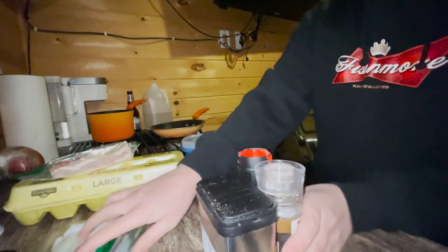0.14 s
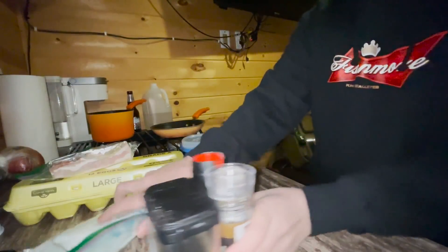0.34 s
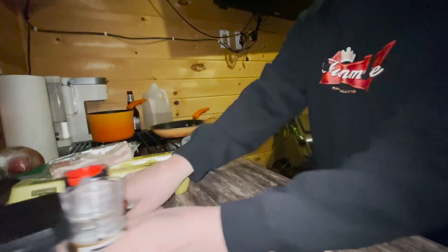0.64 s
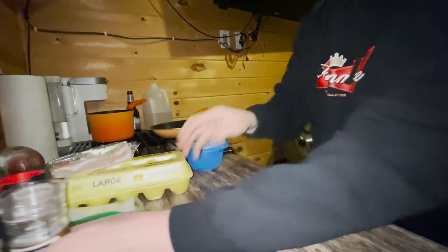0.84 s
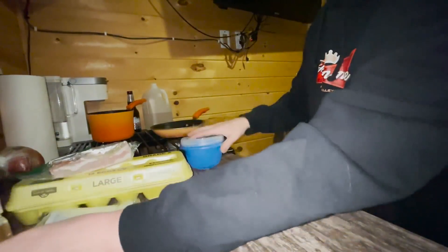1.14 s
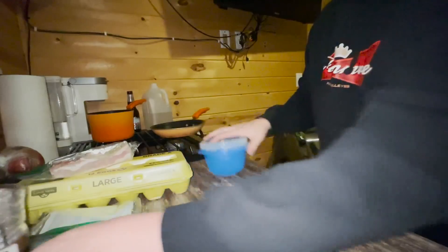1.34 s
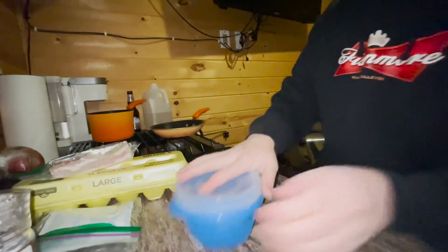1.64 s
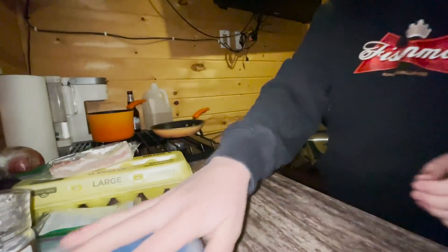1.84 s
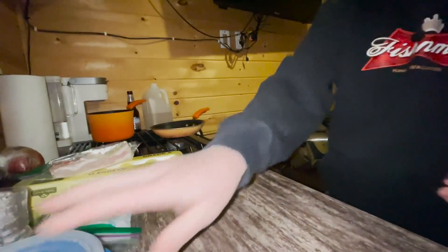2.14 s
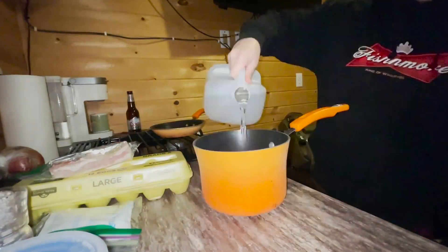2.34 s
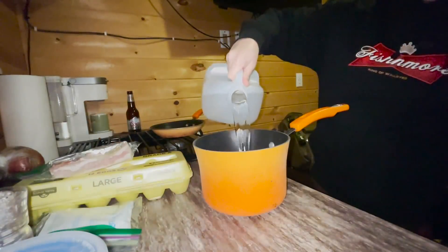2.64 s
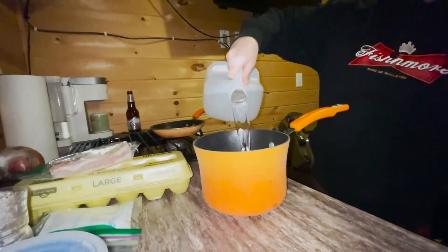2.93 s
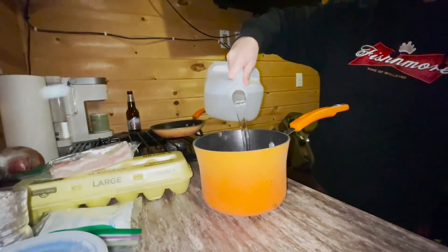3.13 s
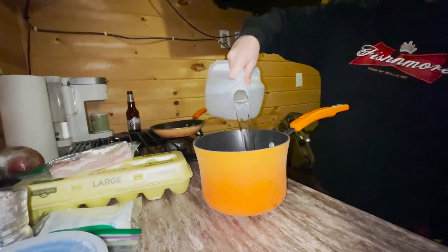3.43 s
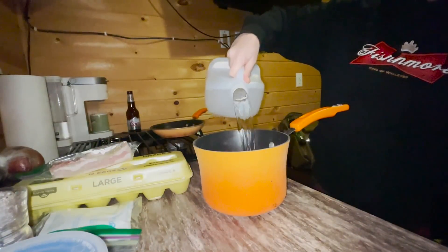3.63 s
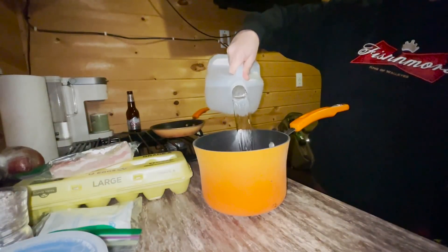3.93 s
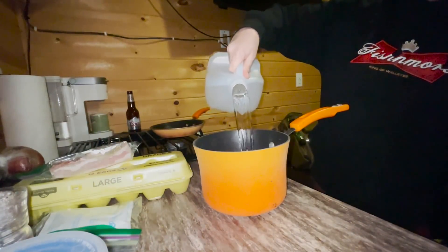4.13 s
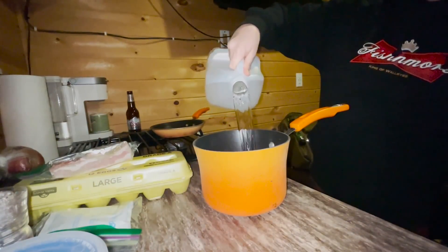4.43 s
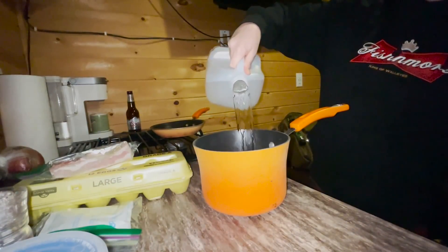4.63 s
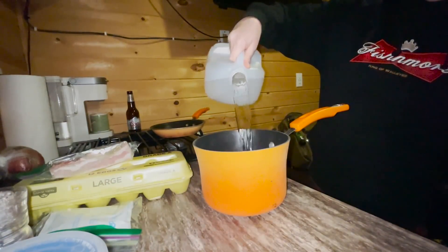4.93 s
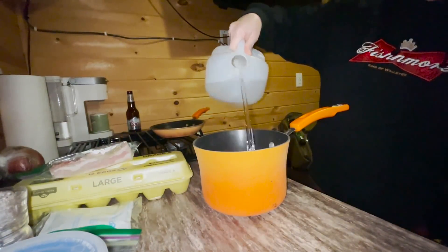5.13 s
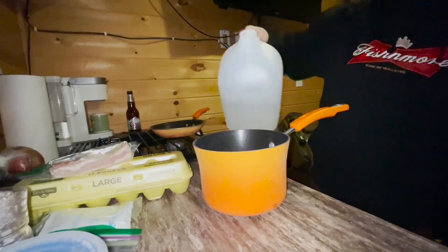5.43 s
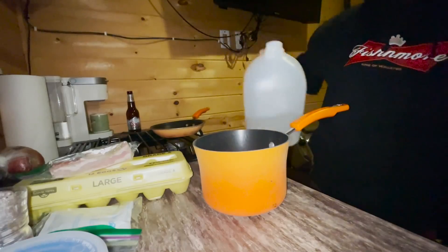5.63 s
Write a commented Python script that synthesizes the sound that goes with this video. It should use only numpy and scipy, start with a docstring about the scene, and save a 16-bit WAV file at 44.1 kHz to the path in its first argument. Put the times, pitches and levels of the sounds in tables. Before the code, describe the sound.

Jars judder and scratch across a counter while a sleeve rustles and thin plastic snaps. A plastic tub knocks down, slides with a hollow rub and lands among other things with a small metallic rattle. Then water pours from a jug into a saucepan, splashing, bubbling and plopping. A generator hums low through the wall of the small wooden cabin. The microphone sits close by on the counter.

```python
"""Jars judder and scratch across a counter in a small wooden cabin, their bases sticking and slipping.
A plastic tub slides after them; things knock down, thin plastic snaps, metal jingles, a sleeve rustles.
Then water pours from a jug into a saucepan: fine spray, ringing bubbles, deeper plops, a singing wall.
A generator hums through the cabin wall. All is heard at two microphone ports on the counter."""
import sys
import numpy as np
from scipy import signal
from scipy.fft import rfft, irfft
from scipy.io import wavfile
from scipy.ndimage import uniform_filter1d

SR = 44100
rng = np.random.default_rng(int(sys.argv[2]) if len(sys.argv) > 2 else 0)


def wrap_up_sound(samples):
    """Save the sound to the file named by the first command line argument, as 16-bit audio."""
    columns = np.atleast_2d(samples).T
    # keep every value between -1 and 1, then stretch to whole-number steps
    tamed = np.clip(columns, -1, 1)
    steps = np.round(tamed * 32767).astype(np.int16)
    wavfile.write(sys.argv[1], SR, steps)


N = 254456
TIME_S, FREQ_HZ = np.arange(N) / SR, np.fft.rfftfreq(N, 1 / SR)
POUR_START_S, POUR_LENGTH_S = 2.875, 2.485

# jar pushes: t/s, length/s, judder/dB, scratch/dB
PUSHES = [(-.1, 0.089, -21.5, -34), (0.113, 0.063, -29.5, -36), (0.211, 0.85, -18, -26)]
# blows on the counter: t/s, level/dB, cutoff/Hz, contact decay/s
COUNTER_HITS = [(0.149, -19.5, 340, 0.012), (0.248, -17, 1000, 0.0092), (0.378, -11.5, 454, 0.0092),
                (1.127, -20, 800, 0.03), (1.382, -12.5, 440, 0.044), (1.448, -15, 334, 0.093),
                (1.52, -14, 433, 0.014), (1.587, -15, 306, 0.032), (1.93, -20.5, 160, 0.026),
                (2.006, -28, 300, 0.03), (2.074, -15.5, 1190, 0.028), (2.116, -16.5, 160, 0.0025),
                (2.162, -16.5, 700, 0.024), (2.243, -29.5, 260, 0.053)]
# tub base landing: t/s, level/dB, cutoff/Hz
TUB_LANDINGS = [(1.3768, -9, 2200), (1.405, -22, 1500), (1.4768, -15.5, 1200), (1.489, -7.5, 1700)]
# plastic snaps: t/s, level/dB, tilt/(dB/oct), mode f/Hz, ring/dB
PLASTIC_SNAPS = [(0.1417, -15.5, 1, 2800, 9.5), (0.644, -21.5, -1, 3100, 7), (0.697, -21.5, 1, 3030, 2),
                 (0.885, -31, 6, 4400, -4), (0.8921, -13.5, 6.5, 5400, -6), (0.9945, -17.5, 6, 4030, -24),
                 (1.0621, -18, 1.5, 3460, -9), (1.087, -20, 6.5, 3700, -8), (1.1672, -27, -2, 2900, -2),
                 (1.921, -25.5, 5, 4360, -3), (1.9832, -25.5, 2.5, 3600, -2), (2.357, -43, 11, 4030, -2),
                 (2.659, -41, 28, 11100, 15), (2.755, -42, 15, 6100, -15)]
# tub set down among other things: t/s, level/dB, tilt/(dB/oct), relative jingle/dB
RATTLE_HITS = [(2.0177, -11.5, -2, -4.5), (2.025, -16, -4.5, -30), (2.05, -16.5, -6, -18),
               (2.056, -18.5, 1, 0), (2.073, -16, -1.5, -32), (2.083, -19.5, 0, -38), (2.105, -27.5, 0, -8),
               (2.147, -27.5, 0.5, -26), (2.158, -26.5, -0.5, -41), (2.185, -21.5, -8, -5),
               (2.194, -20, -6, -20), (2.211, -24, -3, -5), (2.23, -25, -10.5, -25)]
# sleeve and packaging moves: t/s, length/s, level/dB, attack/s, fade/(dB/s)
RUSTLES = [(0.077, 0.022, -43, 0.0075, 2), (0.092, 1.13, -40.5, 0.12, 9), (1.058, 0.044, -36.5, .003, 60),
           (1.218, 1.31, -49.5, 0.095, 13.5), (5.496, 0.098, -65, 0.024, 15), (5.63, .2, -56, 0.092, 9)]
# stream landing in the pan: t/s, flow/dB, spray/dB
STREAM = [(2.9, -57.5, -62), (3.08, -59, -62.5), (3.49, -56.5, -61.5), (3.82, -50, -58.5),
          (3.94, -53, -60.5), (4.13, -56, -66.5), (4.348, -57.5, -67.5), (4.75, -60, -71.5),
          (4.95, -58.5, -65.5), (5.17, -52.5, -60.5), (5.23, -50, -56), (5.36, -59, -66)]
# drops hitting pan or water: t/s, level/dB, tilt/(dB/oct)
DROPS = [(2.885, -42.5, 2), (3.009, -36.5, -1), (3.069, -34, 0), (3.101, -37, 0), (3.242, -32.5, -3),
         (4.039, -36, -2.5), (3.299, -29.5, 4.5), (4.323, -38.5, -2.5), (4.618, -39.5, -3.5),
         (4.718, -36.5, -4), (4.841, -36, -8.5), (4.89, -38, -8), (5.19, -46, -3), (5.237, -37, -5.5),
         (5.286, -35, -4), (5.374, -36, -6)]
# single bubbles: t/s, relative level/dB, f/Hz, t60/s
PLOPS = [(2.733, -48, 2310, 0.079), (2.901, -48, 5140, 0.02), (2.954, -43, 2850, 0.019),
         (3.003, -32, 2970, 0.02), (3.011, -36, 6050, 0.011), (3.022, -37, 5830, 0.018),
         (3.075, -36.5, 1760, 0.041), (3.1, -34.5, 7950, 0.0071), (3.202, -37.5, 2830, 0.02),
         (3.244, -36.5, 3150, 0.018), (3.245, -36.5, 705, 0.063), (3.266, -34.5, 626, 0.059),
         (3.431, -40, 2760, 0.03), (3.607, -44, 680, 0.07), (3.611, -46.5, 1030, 0.063),
         (3.62, -40, 615, 0.14), (3.684, -34.5, 666, 0.073), (3.727, -40, 2340, 0.04),
         (3.783, -33.5, 2220, 0.022), (3.807, -41, 2930, 0.036), (3.843, -49, 690, 0.24),
         (3.967, -37.5, 2430, 0.042), (3.992, -39, 2270, 0.052), (4.04, -36.5, 2390, 0.02),
         (4.06, -36, 2200, 0.047), (4.091, -38, 2330, 0.027), (4.114, -36, 2870, 0.012),
         (4.305, -41, 2500, 0.014), (4.322, -46, 1065, 0.087), (4.323, -41, 2730, 0.023),
         (4.352, -44.5, 610, .16), (4.387, -34, 762, 0.16), (4.423, -32, 674, 0.061),
         (4.424, -41.5, 2470, 0.025), (4.485, -31.5, 520, 0.11), (4.585, -50, 702, 0.19),
         (4.697, -43, 2360, 0.017), (4.718, -42, 2400, 0.018), (4.726, -40.5, 628, 0.099),
         (4.773, -39.5, 670, 0.12), (4.84, -40.5, 3000, 0.02), (4.843, -43, 674, 0.15),
         (4.89, -38.5, 2310, 0.022), (4.891, -34.5, 540, 0.062), (4.893, -40, 864, 0.11),
         (4.949, -44, 2480, 0.02), (5.113, -41, 6800, 0.02), (5.144, -43, 1290, 0.046),
         (5.191, -24, 577, 0.025), (5.21, -37.5, 2450, 0.044), (5.217, -40, 6300, 0.01),
         (5.271, -40, 2640, 0.026), (5.286, -32.5, 535, 0.054), (5.325, -43, 2700, 0.022),
         (5.35, -45, 2390, .03), (5.365, -24, 515, 0.047)]
# pan wall tones: f/Hz, relative level/dB
WALL_TONES = [(1135, -7), (1635, 0), (1900, -7)]
# generator harmonics: multiple of firing rate, relative level/dB
ORDERS = [(1, -61.5), (2, -43), (3, -62), (4, -44), (5, -49), (6, -55), (8, -66.5), (10, -57.5), (12, -86),
          (14, -85)]

# modes of struck bodies: f/Hz, level/dB, t60/s
COUNTER_MODES = [(160, 3, 0.21), (212, 0.5, 0.14), (300, 25, 0.091), (450, 10, 0.015), (710, -4, 0.06),
                 (1210, -6, 0.43)]
TUB_MODES = [(185, -9, .06), (340, -7, .05), (560, -6, .035), (790, -3, .03), (1050, 0, .033),
             (1400, -3, .022), (2100, -11, .018)]
METAL_MODES = [(3343, -19, .45), (4828, -17, .22), (8301, -16, .12), (8630, -5, .19), (8668, -8, .12),
               (8740, -4, .05), (11000, -12, .03)]
PAN_MODES = [(680, 0, .06), (1100, 16, 0.13), (1670, 8, 0.34), (2050, 4, 0.088), (2580, -8, 0.097),
             (7200, -2, 0.11)]
# modes of the rubbed tub: f/Hz, level/dB, t60/s
HOLLOW_MODES = [(640, 34, .029), (1250, -38.5, .056), (4560, -28, .015)]

# source spectra: f/Hz, relative level/dB
JAR_EQ = [(40, -43), (70, -23), (160, -7.5), (230, -16.5), (305, -4.5), (360, -14.5), (450, -10.5),
          (660, -9.5), (930, -13), (1250, -15.5), (1900, -28), (5600, -47.5), (6900, -51), (7600, -65),
          (12700, -86), (16000, -92)]
SLIDE_EQ = [(180, -11), (300, 11.5), (337, -44), (447, -12), (624, 2), (978, -5.5), (2170, -12),
            (3030, -22.5), (4520, -18.5), (5520, -30.5), (6300, -25.5), (7440, -30.5), (12900, -30.5),
            (15200, -41), (16000, -68)]
KNOCK_EQ = [(40, -24.5), (110, -2), (180, -1), (300, -1.5), (450, 2.5), (950, 1), (1800, -8), (4000, -7),
            (16000, -34)]
SNAP_EQ = [(100, -43), (600, -11), (1100, 3), (2100, 14.5), (3300, 9), (4500, 10), (6200, 5), (7400, -3.5),
           (8700, 0), (10000, -15), (13000, -6.5), (16000, -14.5)]
RATTLE_EQ = [(100, -28.5), (600, -17.5), (1300, -12), (2200, -7), (3200, -4), (4800, -3.5), (5700, -11),
             (6700, -8.5), (7600, -25), (8700, -6.5), (9600, -27), (11000, -19.5), (14000, -22),
             (16000, -34)]
RUSTLE_EQ = [(300, 0), (1500, 5.5), (4000, 2), (6500, -0.5), (7600, -5), (8600, -3), (13000, -7.5),
             (16000, -21)]
POUR_EQ = [(260, -35), (450, -20.5), (680, 3), (950, -9), (1500, -8), (2350, -5.5), (3100, -8), (3900, -13),
           (4700, -14.5), (5500, -17.5), (6800, -7.5), (7500, -23), (8300, -5), (10000, -14.5),
           (12200, -6.5), (16000, -28)]
RUMBLE_EQ = [(15, -58), (25, -69), (42, -24), (64, -4), (249, -11), (335, -22), (373, -17), (476, -18.5),
             (659, -31), (1160, -28.5), (7510, -56.5), (11000, -59.5), (16000, -64)]

# paths from each spot to the ports: f/Hz, left-right level/dB, left-right phase/rad, likeness/(0-1)
JAR_SPOT = [(90, 5.0, 0.4, 0.94), (260, -0.3, -0.3, 0.73), (420, -1.6, 1.0, 0.61), (660, 2.8, 2.3, 0.78),
            (1090, 6.5, 2.6, 0.33), (1870, 2.2, 3.3, 0.45), (3350, 4.7, 3.0, 0.11), (6000, 10.6, 0.7, 0.1),
            (9380, 4.4, 2.8, 0.44), (11730, 0.2, 1.1, 0.62), (14140, 0.0, 0.1, 0.96)]
COUNTER_SPOT = [(90, 4.4, 0.3, 0.93), (280, 0.1, 0.4, 0.43), (440, 0.5, 1.3, 0.54), (660, 5.1, 2.1, 0.64),
                (1170, 6.3, 2.7, 0.5), (2040, 3.1, 3.3, 0.27), (3610, 5.9, 2.0, 0.24),
                (6400, 10.0, 3.4, 0.13), (9500, 2.9, 2.1, 0.11), (11730, 0.9, 0.6, 0.88),
                (14140, 0.1, 0.1, 0.97)]
PAN_SPOT = [(100, 1.1, 0.1, 0.95), (320, 1.0, 0.5, 0.5), (540, 0.3, 1.0, 0.72), (780, 5.5, -0.6, 0.27),
            (1380, 2.8, 1.7, 0.18), (2570, 1.3, 1.3, 0.54), (4140, 2.8, 2.0, 0.22), (6650, 4.7, 4.6, 0.12),
            (9670, -0.4, 2.6, 0.44), (11730, 0.7, 1.4, 0.79), (14140, 0.0, 0.2, 0.92)]
# cabin reverberation: f/Hz, t60/s
CABIN_DECAY = [(100, 0.51), (500, 0.083), (3000, 0.26), (8000, 0.33), (15000, 0.035)]


def jar_drag(tiring_db_per_s=3, slow_scratch_db=-12.5):
    """Stick-slip: jar bases drum on the counter and scratch it, the scratch strongest at speed."""
    slips = resonate(grains(per_s=2600, spread_db=1.8), COUNTER_MODES, ring_db=-6)
    drumming = band(colour(slips, JAR_EQ), 95, 560)
    scraping = band(colour(grains(per_s=2600, spread_db=1.8), JAR_EQ), 540, 15000)
    judder, scratch = np.zeros((2, N))
    for s, length_s, judder_db, scratch_db in PUSHES:
        push = stroke(s, length_s, attack_s=.053, release_s=.059)
        t = np.clip(TIME_S - s, 0, length_s)
        speed = np.sin(np.pi * np.interp(t / length_s, [0, .24, 1], [0, .5, 1]))  # peak at 24 %
        judder += push * amp(judder_db - tiring_db_per_s * t)
        scratch += push * amp(scratch_db + slow_scratch_db * (1 - speed ** 2))
    out = amp(-3) * drumming * judder + amp(7) * scraping * scratch
    return roaming(out, JAR_SPOT, room_db=-7, near=.35, step_s=.11, count=6)


def tub_slide(fastest_s=1.754, rise_db_per_s=28, fall_db_per_s=34.5, hiss_power=1.96):
    """The counter's grain rubs the tub and rings its hollow; it hisses only while it lies flat."""
    friction = grains(per_s=8300, spread_db=5)
    rub = colour(resonate(friction, HOLLOW_MODES, ring_db=-26), SLIDE_EQ)
    t = TIME_S - fastest_s
    speed_db = np.minimum(rise_db_per_s * t, -fall_db_per_s * t)
    hollow = band(rub, 365, 3240) * amp(-24.5 + speed_db)
    hiss = band(rub, 4100, 22000) * amp(-30 + hiss_power * speed_db)
    touching = stroke(1.2, 1.12, attack_s=.14, release_s=.072)
    flat = stroke(1.42, .58, attack_s=.0081, release_s=.023)
    return placed(touching * hollow + flat * hiss + rim_scrape(), COUNTER_SPOT, room_db=-27)


def rim_scrape(start_s=1.24, length_s=.13, rise_hz_per_s=1105):
    """The tub's rim catches as it starts to move, chattering in a narrow rising band."""
    hz = 830 + rise_hz_per_s * np.clip(TIME_S - start_s, 0, length_s)
    catch = stroke(start_s, length_s, attack_s=.086, release_s=.011)
    return amp(-35) * singing(hz, width_hz=95) * catch


def counter_knocks():
    """Blows ring the counter; soft ones reach only its low modes."""
    out = np.zeros(N)
    for s, db, cutoff_hz, decay_s in COUNTER_HITS:
        blow = signal.sosfilt(butter(cutoff_hz, "low"), burst(decay_s, chatter=3.2))
        knock = colour(resonate(blow, COUNTER_MODES, ring_db=3.5), KNOCK_EQ)
        add(out, s, amp(db) * unit_peak(knock))
    return placed(out, COUNTER_SPOT, room_db=-10, near=.1)


def tub_knocks():
    """The tub lands hard on its base: a brief hollow ring."""
    out = np.zeros(N)
    for s, db, cutoff_hz in TUB_LANDINGS:
        blow = signal.sosfilt(butter([160, cutoff_hz], "band"), burst(decay_s=.003, chatter=.8))
        add(out, s, amp(db) * unit_peak(signal.oaconvolve(blow, ring(TUB_MODES))))
    return placed(out, COUNTER_SPOT, room_db=-12, near=.05)


def handling():
    """Thin plastic flexes and snaps over the rustle of sleeve and packaging."""
    moves = np.zeros(N)
    for s, length_s, db, attack_s, fade_db_per_s in RUSTLES:
        gain = amp(db - fade_db_per_s * np.maximum(TIME_S - s, 0))
        moves += gain * stroke(s, length_s, attack_s, release_s=.0058)
    out = moves * unit_rms(colour(grains(per_s=2500, spread_db=3), RUSTLE_EQ))
    for s, db, tilt, hz, ring_db in PLASTIC_SNAPS:
        flex = resonate(burst(decay_s=.0035, chatter=.85), [(hz, 0, .0016)], ring_db)
        add(out, s, amp(db) * unit_peak(colour(flex, SNAP_EQ, tilt)))
    return placed(out, COUNTER_SPOT, room_db=-13, near=.035)


def rattle():
    """Short hard contacts, each ringing a small metal piece."""
    out = np.zeros(N)
    for s, db, tilt, jingle_db in RATTLE_HITS:
        crack = unit_peak(colour(burst(decay_s=.0066, chatter=1.8), RATTLE_EQ, tilt))
        jingle = amp(jingle_db - 14) * ring(METAL_MODES, size=len(crack))
        add(out, s, amp(db) * (crack + jingle))
    return placed(out, COUNTER_SPOT, room_db=-8.5, near=.052)


def pour(full_gurgle_db=6, full_mist_db=-1.5):
    """The stream breaks into lumps that whip in bubbles and throw droplets; the pan rings and fills."""
    lumps = amp(2.2 * np.tanh(drift(width_hz=28)))
    patter = unit_rms(grains(per_s=4500, spread_db=2.8))
    froth = swarm(600, 3400, per_s=700, cycles=20, spread_db=4)
    droplets = swarm(4600, 15000, per_s=1400, cycles=36, spread_db=4.4)
    impacts = lumps * (patter + amp(-5) * froth + amp(3.5) * droplets)
    water = colour(resonate(impacts, PAN_MODES, ring_db=2), POUR_EQ)
    # deeper water gurgles more and cushions the finest spray
    depth = np.maximum(TIME_S - POUR_START_S, 0) / POUR_LENGTH_S
    gurgle = band(water, 480, 1400) * amp(-5 + full_gurgle_db * depth)
    mist = signal.sosfiltfilt(butter(9500, "high"), water)
    cushioned = water - mist * (1 - amp(full_mist_db * depth))
    fizz = amp(-1.5) * band(water, 1400, 4000)
    spatter = amp(-5.5) * lumps * swarm(4200, 9500, per_s=260, cycles=60, spread_db=3.5, count=24)
    blips = amp(-5) * swarm(1700, 3600, per_s=110, cycles=20, spread_db=3, count=20)
    times_s, flow_db, spray_db = np.transpose(STREAM)
    bubbling = (gurgle + fizz + blips) * amp(np.interp(TIME_S, times_s, flow_db))
    spray = (band(cushioned, 4000, 17000) + spatter) * amp(2.5 + np.interp(TIME_S, times_s, spray_db))
    out = (bubbling + spray) * stroke(POUR_START_S, POUR_LENGTH_S, attack_s=.029, release_s=.012)
    for s, db, tilt in DROPS:
        smack = colour(burst(decay_s=.003, chatter=1), POUR_EQ, tilt)
        add(out, s, amp(db) * unit_peak(smack))
    return roaming(out, PAN_SPOT, room_db=-6, near=.22, step_s=.023)


def plops(shed_count=7, shed_within_s=.028, shed_db_per_oct=6.5):
    """Single bubbles ring and shed fainter ones; below 2400 Hz they stay more in one piece."""
    out = np.zeros(N)
    for s, db, hz, t60_s in PLOPS:
        add(out, s, amp(db) * bubble(hz, t60_s, rise=.14))
        shed_db = db - 11.5 + shed_db_per_oct * np.log2(min(hz / 2400, 1))
        for lateness, pitch in rng.random((shed_count, 2)):
            shed_hz = hz * 2 ** (.6 * pitch - .2)
            shed = amp(shed_db) * bubble(shed_hz, t60_s / 2, rise=.36)
            add(out, s + shed_within_s * lateness ** 2, shed)
    return amp(2) * placed(out, PAN_SPOT, room_db=-9, near=.025)


def bubble(hz, t60_s, rise):
    """Trapped air rings, its pitch rising as it nears the surface."""
    age = np.arange(int(t60_s * SR)) / (t60_s * SR)
    turns = np.cumsum(hz * (1 + rise * age)) / SR
    onset = 1 - np.exp(-turns / .51)
    return onset * amp(-60 * age) * np.sin(2 * np.pi * turns)


def swarm(lo_hz, hi_hz, per_s, cycles, spread_db, count=40):
    """Small bubbles of `count` sizes at random times, rms 1."""
    out = np.zeros(N)
    for hz in np.geomspace(lo_hz, hi_hz, count):
        shape = bubble(hz, cycles * rng.uniform(.6, 1.4) / hz, rise=.1)
        out += signal.oaconvolve(grains(per_s / count, spread_db), shape)[:N]
    return unit_rms(out)


def pan_wall(level_db=-62.5):
    """The stream keeps the metal wall ringing; sloshing water loads it and sways its pitch."""
    sway = 1 + .011 * drift(width_hz=7)
    out = sum(amp(level_db + db) * singing(hz * sway, width_hz=16) for hz, db in WALL_TONES)
    out *= stroke(POUR_START_S, POUR_LENGTH_S, attack_s=1.2, release_s=.054)
    return placed(out, PAN_SPOT, room_db=-12, near=.06)


def generator(firing_hz=31.15, sag_db_per_s=1):
    """Only low orders of the firing pulses pass the wall, wavering over a dull rumble and faint hiss."""
    turns = np.cumsum(firing_hz * (1 + .002 * drift(width_hz=1.32))) / SR
    hum = np.zeros(N)
    for order, db in ORDERS:
        gain = amp(db + 2 * drift(width_hz=5))
        hum += gain * np.cos(2 * np.pi * order * turns + .3 * drift(width_hz=3))
    hum *= amp(3.5 - sag_db_per_s * TIME_S)
    rumble = amp(-43) * noise(amp(lookup(RUMBLE_EQ, FREQ_HZ)))
    return amp([[.7], [-.7]]) * hum + placed(rumble, PAN_SPOT, room_db=-22.5, near=.54)


def echoes(t60_scale, size=16384):
    """Flattened spectrum of dense wall reflections, each band dying at its own rate."""
    hz, t, frames = signal.stft(rng.standard_normal(size), SR, nperseg=128)
    t60_s = t60_scale * lookup(CABIN_DECAY, hz)[:, None]
    tail = signal.istft(frames * amp(-60 * t / t60_s), SR, nperseg=128)[1]
    spectrum = rfft(tail[:size], 4 * size)
    return spectrum / local_rms(spectrum, 120)


def placed(x, spot, room_db, near=.082, size=16384):
    """Stereo: shared direct sound, near reflections per port (t60 scaled by `near`), cabin tail."""
    hz = np.fft.rfftfreq(4 * size, 1 / SR)
    balance_db, phase_rad, likeness = (lookup(spot, hz, column) for column in (1, 2, 3))
    sides, lead = np.array([[.5], [-.5]]), size // 256
    direct = np.sqrt(likeness) * np.exp(1j * sides * phase_rad)
    paths = direct + np.sqrt(1 - likeness) * np.array([echoes(near), echoes(near)])
    paths *= amp(sides * balance_db) / local_rms(paths, 200)
    paths /= local_rms(paths.mean(0), 1200)  # keeps the centre's colour even
    tail = likeness * echoes(.75) + np.sqrt(1 - likeness ** 2) * np.array([echoes(1), echoes(1)])
    paths += amp(room_db + sides * balance_db) * tail
    taps = np.roll(irfft(paths), lead, axis=1)[:, :size]
    return signal.oaconvolve(x[None], taps, axes=1)[:, lead:N + lead]


def roaming(x, spot, room_db, near, step_s, count=3):
    """A moving source: crossfades round `count` sets of reflections."""
    out = np.zeros((2, N))
    for k in range(count):
        steps_away = abs((TIME_S / step_s - k + count / 2) % count - count / 2)
        fade = np.cos(np.pi / 2 * np.minimum(steps_away, 1)) ** 1.5
        out += placed(x * fade, spot, room_db, near)
    return out


def grains(per_s, spread_db):
    """Random clicks, mostly small."""
    strength = amp(spread_db * np.minimum(rng.exponential(1, N), 4))
    return strength * rng.choice([-1, 1], N) * (rng.random(N) < per_s / SR)


def burst(decay_s, chatter, size=12000):
    """One impact, then dying contact chatter."""
    t = np.arange(size) / SR
    after = rng.standard_normal(size) * np.exp(-t / decay_s)
    return (t == 0) + chatter * after / np.linalg.norm(after)


def ring(modes, size=16000):
    """Decaying sines of a struck body."""
    t = np.arange(size) / SR
    return sum(amp(db - 60 * t / t60_s) * np.sin(2 * np.pi * hz * t) for hz, db, t60_s in modes)


def resonate(force, modes, ring_db):
    """A force heard directly and through the modes it rings."""
    body = ring(modes)
    return force + amp(ring_db) * signal.oaconvolve(force, body / abs(rfft(body)).max())[:len(force)]


def singing(hz, width_hz):
    """Randomly driven narrow resonance along a pitch curve, rms 1."""
    carrier = np.exp(2j * np.pi * np.cumsum(hz) / SR)
    return unit_rms((carrier * (drift(width_hz) + 1j * drift(width_hz))).real)


def stroke(start_s, length_s, attack_s, release_s):
    """Envelope: linear attack, hold, exponential release."""
    t = TIME_S - start_s
    return np.clip(t / attack_s, 0, 1) * np.exp(-np.maximum(t - length_s, 0) / release_s)


def drift(width_hz):
    """Slow random wander, rms 1."""
    return noise(np.exp(-(FREQ_HZ / width_hz) ** 2))


def noise(spectrum):
    return unit_rms(irfft(rfft(rng.standard_normal(N)) * spectrum, N))


def colour(x, eq, tilt_db_per_oct=0, size=2048):
    """Minimum-phase filter, tilted about 3 kHz."""
    hz = np.fft.rfftfreq(size, 1 / SR)
    gain_db = np.maximum(lookup(eq, hz), -90) + tilt_db_per_oct * np.log2((hz + 50) / 3000)
    log_gain = np.log(amp(np.r_[gain_db, gain_db[-2:0:-1]]))
    taps = np.fft.ifft(np.exp(np.conj(signal.hilbert(log_gain)))).real
    return signal.oaconvolve(x, taps[:size // 2])[:len(x)]


def band(x, lo_hz, hi_hz):
    """Band-pass, rms 1."""
    return unit_rms(signal.sosfilt(butter([lo_hz, min(hi_hz, .49 * SR)], "band", order=4), x))


def butter(hz, kind, order=2):
    return signal.butter(order, hz, kind, fs=SR, output="sos")


def lookup(table, hz, column=1):
    """Interpolates a column over log frequency."""
    columns = np.transpose(table)
    return np.interp(np.log(hz + 1), np.log(columns[0] + 1), columns[column])


def local_rms(spectrum, bins):
    return np.sqrt(uniform_filter1d(abs(spectrum) ** 2, bins))


def unit_peak(x):
    """Scales the strongest 2 ms to the power of a unit sine."""
    return x / np.sqrt(2 * uniform_filter1d(x ** 2, 88).max())


def unit_rms(x):
    return x / np.sqrt(np.mean(x ** 2) + 1e-20)


def amp(db):
    return 10 ** (np.asarray(db) / 20)


def add(mix, start_s, sound):
    part = mix[max(0, round(start_s * SR)):][:len(sound)]
    part += sound[:len(part)]


def scene():
    """Counter sounds, then the pour, over the generator."""
    counter = jar_drag() + tub_slide() + counter_knocks() + tub_knocks() + handling() + rattle()
    return counter + pour() + plops() + pan_wall() + generator()


def record(dry):
    """Steep low-pass at 15.9 kHz."""
    taps = signal.firwin(255, 15900, window=("kaiser", 9), fs=SR)
    return signal.oaconvolve(dry, taps[None], "same")


dry = scene()
out = record(dry)
wrap_up_sound(out)
```